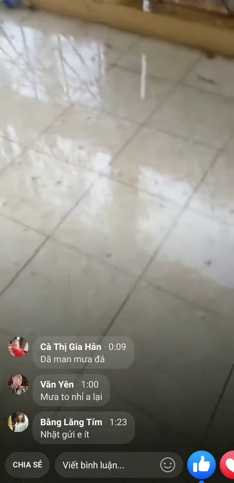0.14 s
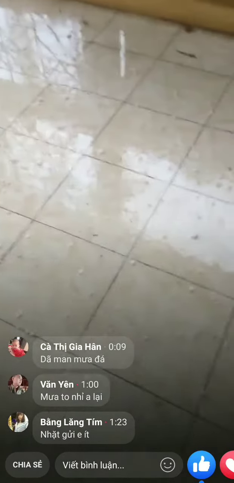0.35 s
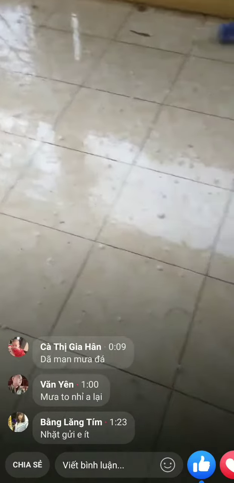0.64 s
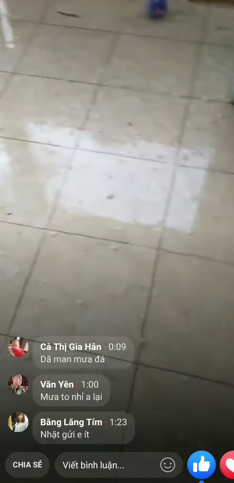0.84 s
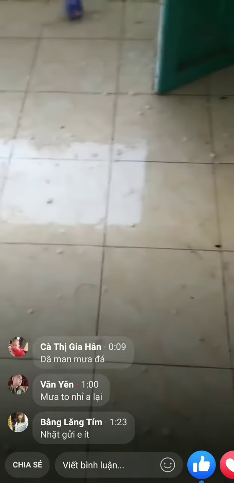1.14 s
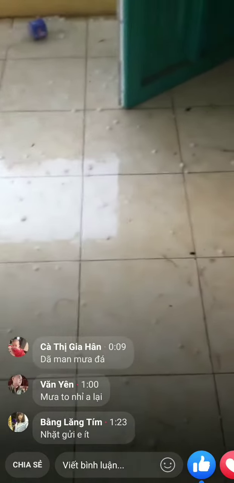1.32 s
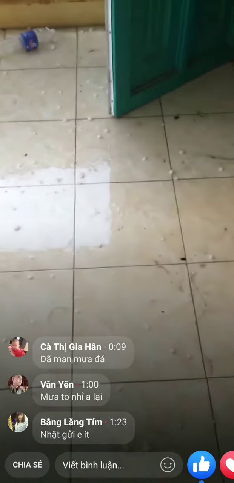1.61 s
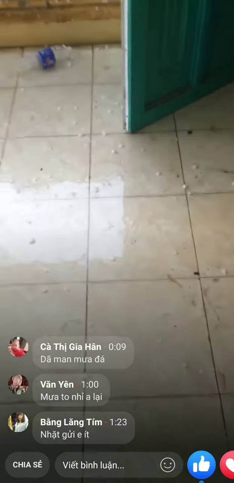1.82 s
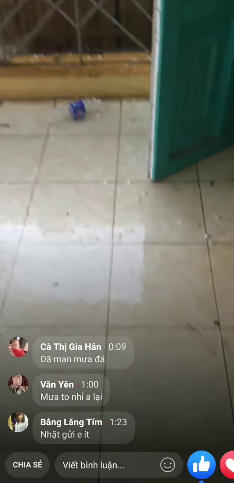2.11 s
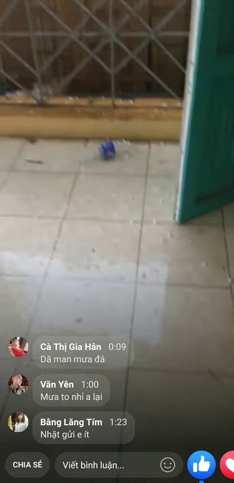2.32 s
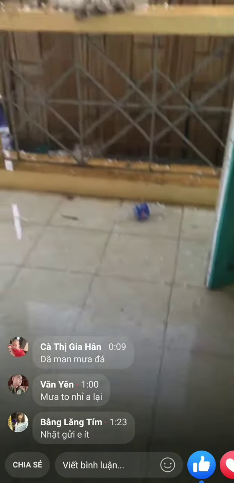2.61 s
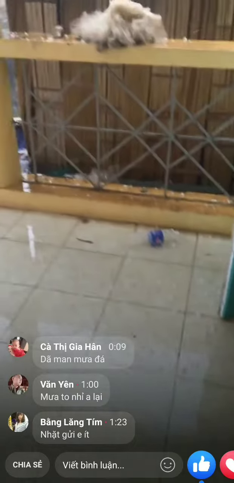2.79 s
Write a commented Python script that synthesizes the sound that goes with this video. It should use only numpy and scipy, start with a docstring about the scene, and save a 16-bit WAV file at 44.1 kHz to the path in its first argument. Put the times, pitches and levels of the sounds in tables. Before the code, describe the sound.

Hailstorm with heavy rain on metal roofs and a tiled porch, big stones cracking sharply nearby

```python
"""Heavy rain and hail heard from a tiled porch, in mono. From the start metal roofs roar all around, drops and
small ice patter in a bright hiss (filtered noise and random clicks), and faint hums come and go beneath.
Big hailstones crack and ring close by throughout (noise bursts with dying sines), the loudest from 0.4 to 1.5 s.
Dull roof knocks come between 0.5 and 2.6 s, and one stone pings on a metal bar at 2.3 s.
The big ones overload the microphone, and its gain control ducks the rain for a moment after each."""
import sys
import numpy as np
from scipy import signal
from scipy.fft import rfft, irfft
from scipy.io import wavfile

SR = 44100
rng = np.random.default_rng(int(sys.argv[2]) if len(sys.argv) > 2 else 0)


def put_to_file(sound):
    """Save the sound as 16-bit audio at rate SR, in the file named by the first command-line argument."""
    columns = np.atleast_2d(sound).T  # one column per channel
    safe = np.clip(columns, -1, 1)
    whole_steps = np.round(safe * 32767)
    wavfile.write(sys.argv[1], SR, whole_steps.astype(np.int16))


N = 130095
TIME = np.arange(N) / SR   # s

# Colour of struck ice, for large and small stones alike: f/Hz, level/dB
STONE_COLOUR = [(60, -51), (300, -50.5), (1000, -24.5), (2200, -20), (3200, -9), (4000, -3), (5400, 0),
                (7150, 2.5), (7700, -17), (8400, -9), (10300, -19.5), (11000, -33.5), (16000, -29.5)]
STONE_LOW_HZ, STONE_HIGH_HZ = 3413, 8694   # range in which a struck spot rings


def from_db(db):
    """Decibels to gain."""
    return 10 ** (np.asarray(db) / 20)


def rms_one(x):
    """Scale to rms 1."""
    return x / np.sqrt(np.mean(x ** 2) + 1e-20)


def level(rows):
    """Gain over time from rows of t/s, level/dB, joined by straight lines in dB."""
    return from_db(np.interp(TIME, *np.transpose(rows)))


def smooth(x, seconds):
    """One-pole low-pass with a time constant in seconds."""
    r = np.exp(-1 / (seconds * SR))
    return signal.lfilter([1 - r], [1, -r], x)


def drift(rate):
    """Random wander with rms 1, through two random points per flutter."""
    knots = rng.standard_normal(N)
    return rms_one(np.interp(TIME * rate * 2, np.arange(N), knots))


def coloured(x, points, size=2048):
    """Causal minimum-phase filter through f/Hz, level/dB points; white noise keeps its power."""
    hz, db = np.transpose(points)
    grid = np.maximum(np.fft.rfftfreq(size, 1 / SR), 1)
    curve_db = np.interp(np.log(grid), np.log(hz), db)
    cepstrum = irfft(np.log(rms_one(from_db(curve_db))))
    # folding the cepstrum onto positive time gives minimum phase
    fold = np.r_[1, np.full(size // 2 - 1, 2), 1, np.zeros(size // 2 - 1)]
    response = irfft(np.exp(rfft(cepstrum * fold)))
    return signal.fftconvolve(x, response)[:N]


def add(out, s, sound):
    """Mix a sound in at time s, cut at the end of out."""
    start = max(int(s * SR), 0)
    part = out[start:start + len(sound)]
    part += sound[:len(part)]


def dying(t60):
    """An envelope that falls by 60 dB in t60 seconds, then ends."""
    t = np.arange(int(t60 * SR)) / SR
    return from_db(-60 * t / t60)


def mode(hz, t60):
    """A struck mode: a dying sine."""
    envelope = dying(t60)
    return envelope * np.sin(2 * np.pi * hz * TIME[:len(envelope)])


def hum(lines, curve):
    """A faint low hum: steady sines under one level curve."""
    tones = sum(from_db(db) * np.sqrt(2) * np.sin(2 * np.pi * (hz * TIME + rng.random())) for hz, db in lines)
    return level(curve) * tones


def hums():
    """Two faint hums, one deeper than the other, that come and go separately."""
    # Tones of each hum: f/Hz, level/dB
    deep_lines = [(51, -49), (75, -64)]
    upper_lines = [(129, -55)]
    # Rise and fall of each hum, on top of its tones: t/s, level/dB
    deep_level = [(0, -7), (.38, 6.5), (.88, 0.5), (1.02, -19), (1.92, -10), (2.1, 9), (2.4, -5), (2.8, -2),
                  (2.95, -12)]
    upper_level = [(0, 3.5), (.26, 4.5), (.5, -11), (.65, 0.5), (.9, 1), (1.15, -5), (2.95, -10)]
    return hum(deep_lines, deep_level) + hum(upper_lines, upper_level)


def shower(per_s, spread_db):
    """Random drops of uneven size over the smooth hiss of far ones, with a slight flutter."""
    far_hiss_db = 1   # merged far drops, relative to the separate ones
    flicker_db, flicker_rate = .5, 47   # rms depth of the flutter; flutters per second
    sizes = from_db(spread_db * np.minimum(rng.exponential(1, N), 5))
    signs = rng.choice([-1, 1], N)
    landed = rng.random(N) < per_s / SR
    drops = rms_one(sizes * signs * landed)
    far_hiss = from_db(far_hiss_db) * rng.standard_normal(N)
    return rms_one(drops + far_hiss) * from_db(flicker_db * drift(flicker_rate))


def roof_rain():
    """The roar of rain on metal roofs all around: dense drops through the colour of the sheets."""
    # Loudness of the roar: t/s, level/dB
    roof_level = [(0, -25), (.4, -24), (.53, -24), (.58, -20.5), (.69, -23.5), (1.02, -22), (1.12, -24.5),
                  (1.3, -22), (1.5, -25.5), (1.56, -21.5), (1.74, -22), (1.86, -23.5), (2.08, -21.5),
                  (2.3, -24), (2.55, -24), (2.72, -28.5), (2.8, -23.5), (2.95, -24)]
    # Colour of the roar: f/Hz, level/dB
    roof_colour = [(20, -7.5), (85, -13.5), (130, -39.5), (220, -30.5), (320, -18), (500, -12), (780, -6),
                   (950, -2), (1400, 0.5), (1750, -1), (2600, -1.5), (4000, 3), (9000, -27)]
    return level(roof_level) * coloured(shower(per_s=4400, spread_db=1.5), roof_colour)


def near_splashes():
    """Bright splashes near the microphone: denser drops, with most of the power in the treble."""
    # Loudness of the splashes: t/s, level/dB
    splash_level = [(0, -13), (.13, -17.5), (.28, -12.5), (.36, -17.2), (.52, -13.5), (.62, -14),
                    (.72, -13), (.95, -12.5), (1.17, -13), (1.27, -13.5), (1.4, -13), (1.62, -13.5),
                    (1.8, -13.5), (1.88, -15.5), (2.0, -15.5), (2.3, -15), (2.72, -17.5), (2.95, -16.5)]
    # Colour of the splashes: f/Hz, level/dB
    splash_colour = [(500, -54), (1800, -29.5), (2700, -15), (3400, -14.5), (3850, -4.5), (4200, -0.5),
                     (4650, -8.5), (5250, 0.5), (6100, -3.5), (6900, 1), (7250, 0.5), (7550, -7.5),
                     (7800, -16), (8100, -8.5), (8600, -12), (9200, -14.5), (9900, -21), (10500, -23.5),
                     (11000, -28.5), (13300, -32), (15500, -49.5)]
    return level(splash_level) * coloured(shower(per_s=6000, spread_db=1.5), splash_colour)


def pings(per_s, db, t60, low_hz, high_hz):
    """Drops or ice land at random all over a surface, each ringing at a pitch of its own."""
    out = np.zeros(N)
    for when, pitch, size in rng.random((int(per_s * N / SR), 3)):
        hz = low_hz * (high_hz / low_hz) ** pitch
        add(out, when * N / SR, from_db(db) * (.5 + size) * mode(hz, t60))
    return out


def roof_pings():
    """Stones ring the metal sheets at random pitches."""
    return pings(per_s=55, db=-30, t60=0.07, low_hz=801, high_hz=2397)


def tile_ticks():
    """Drops tick on the tiles: a dense patter of short rings through a band-pass."""
    rings = pings(per_s=260.5, db=-15.5, t60=0.0778, low_hz=5005, high_hz=7360)
    return signal.sosfilt(signal.butter(2, [4300, 7700], "band", fs=SR, output="sos"), rings)


def knocks(count=4):
    """Stones knock dully on the roof, each setting off a cluster of low modes."""
    # Roof knocks: t/s, level/dB, f/Hz around which the modes are scattered
    roof_knocks = [(0.571, -36, 285), (.905, -30, 236), (1.055, -25, 185), (1.54, -34.5, 413),
                   (1.72, -30, 527), (2.585, -39, 314)]
    knock_t60_s = 0.12
    out = np.zeros(N)
    for s, db, hz in roof_knocks:
        for k, share in enumerate(rng.uniform(0.782, 1.3, count)):
            sign = (-1) ** k
            add(out, s, sign * from_db(db) / np.sqrt(count) * mode(hz * share, knock_t60_s))
    return out


def bar():
    """One stone shatters on a metal bar: rough contact noise drives its modes into a short ping."""
    # Modes of the bar: f/Hz, level/dB relative to the hit, t60/s
    bar_modes = [(2816, -1, 0.15), (2950, -2, 0.051), (3075, 4, 0.042), (3190, -11, 0.045)]
    hit_s, hit_db, contact_s = 2.293, -8.5, 0.0023   # contact_s: the crunch peaks after this time
    out = np.zeros(N)
    for hz, db, t60 in bar_modes:
        crunch = rng.standard_normal(N) * TIME * np.exp(-TIME / contact_s)
        ping = np.diff(signal.fftconvolve(crunch, mode(hz, t60)))
        add(out, hit_s, from_db(hit_db + db) * ping / np.abs(ping).max())
    return out


def impact(t60, hz, count=7):
    """One stone: a sharp tick, then a main ring with weaker ones around it and clatter echoing in the porch."""
    tick_db, ring_db, clatter_db = 4.5, -7.5, -4   # parts of one impact
    tick_s, build_s = 0.0006, 0.0055   # time constants: decay of the tick, swell of the reflections
    ring_t60_s = 0.066   # ring of the struck spot
    other_hz = rng.uniform(STONE_LOW_HZ, STONE_HIGH_HZ, count)
    others = sum(mode(f, ring_t60_s) for f in other_hz) * np.sqrt(2 / count)
    envelope = dying(t60)
    t = TIME[:len(envelope)]
    noise = rng.standard_normal(len(envelope))
    body = from_db(clatter_db) * envelope * noise
    add(body, 0, from_db(ring_db) * (mode(hz, ring_t60_s) + others))   # cut where the clatter ends
    tick = from_db(tick_db) * np.exp(-t / tick_s) * noise
    return tick + (1 - np.exp(-t / build_s)) * body


def small_hail():
    """Small stones fall at random, each a short weak impact."""
    per_s, t60_s = 180, 0.048
    weakest_db, spread_db = -22.5, 3.5   # the strongest lie two spreads above the weakest
    out = np.zeros(N)
    for _ in range(int(per_s * N / SR)):
        gain = from_db(weakest_db + spread_db * min(rng.exponential(), 2))
        hz = rng.uniform(STONE_LOW_HZ, STONE_HIGH_HZ)
        add(out, rng.uniform(0, N / SR), gain * impact(t60_s, hz))
    return coloured(out, STONE_COLOUR)


def spray(t60):
    """A shattering stone throws a dying crackle of ice fragments: random clicks."""
    fragments_per_s = 11000
    landed = rng.random(N) < fragments_per_s / SR
    fragments = rms_one(rng.standard_normal(N) * landed)
    envelope = dying(t60)
    return envelope * fragments[:len(envelope)]


def big_hailstones():
    """Big stones crack and ring close to the microphone, each with its spray of ice."""
    # Big stones: t/s, level/dB, clatter t60/s, strongest ring f/Hz, ice spray level/dB
    hailstones = [(.074, -10, .05, 6200, -25), (0.18, -7, 0.13, 6800, -24), (0.262, -10, 0.12, 6270, -28),
                  (0.294, -10, 0.21, 5920, -22), (.42, 2.5, 0.29, 6160, -15),
                  (0.621, -9.5, 0.11, 6770, -42), (0.672, -3, 0.023, 5450, -31),
                  (.775, -4, 0.18, 6860, -27), (.802, -8, 0.17, 5880, -25), (.908, 3.5, 0.098, 5760, -12),
                  (.938, -6, 0.28, 6900, -39), (1.054, 5, 0.15, 5564, -19.5),
                  (1.083, -1.5, 0.35, 5450, -25), (1.226, -6.5, 0.032, 5880, -36),
                  (1.33, 0, 0.18, 5650, -22), (1.432, 2.5, 0.19, 6740, -15), (1.545, -3, 0.18, 5350, -22.5),
                  (1.6, -14, .1, 5600, -34), (1.725, -7.5, 0.22, 5500, -42), (1.764, -8, .1, 5440, -27),
                  (1.803, -8.5, 0.081, 6700, -20), (2.067, -8, .05, 5130, -44),
                  (2.149, -10.5, 0.069, 6660, -41), (2.235, -8, .08, 5320, -31),
                  (2.296, -4.5, 0.12, 6510, -15.5), (2.425, -5, 0.2, 4130, -22),
                  (2.561, -3.5, 0.41, 6600, -15.5), (2.612, -14, 0.2, 6600, -23),
                  (2.8, -6, 0.073, 6450, -21)]
    # Colour of the ice spray: f/Hz, level/dB
    spray_colour = [(60, -5), (250, -3), (1000, -4), (3000, 3.5), (9000, 6), (11500, -2), (14500, -1.5),
                    (16000, -11)]
    spray_length = 0.88   # relative to the clatter
    stones, ice = np.zeros((2, N))
    for s, db, t60, hz, spray_db in hailstones:
        add(stones, s, from_db(db) * impact(t60, hz))
        add(ice, s, from_db(spray_db) * spray(spray_length * t60))
    return coloured(stones, STONE_COLOUR) + coloured(ice, spray_colour)


def scene():
    """Everything reaches one microphone; both channels are alike."""
    background = hums() + roof_rain() + near_splashes()
    surfaces = roof_pings() + tile_ticks() + knocks() + bar()
    hail = small_hail() + big_hailstones()
    return np.tile(background + surfaces + hail, (2, 1))


def record(dry):
    """The microphone overloads, gain control ducks after loud hits, and the top is cut."""
    overload_db, knee = -1.65, 10   # ceiling; a higher knee bends more sharply into it
    listen_s, threshold_db, slope = 0.0073, -6.5, 0.93   # slope: dB of ducking per dB above threshold
    attack_s, release_db_per_s = 0.047, 83
    cutoff_hz = 15700
    top = from_db(overload_db)
    clipped = dry / (1 + np.abs(dry / top) ** knee) ** (1 / knee)
    # the gain control follows the level ahead of the overload
    heard_db = 10 * np.log10(smooth(dry[0] ** 2, listen_s) + 1e-12)
    wanted_db = slope * np.maximum(heard_db - threshold_db, 0)
    # a running maximum on a rising ramp lets the ducking fall back at a steady rate
    release = release_db_per_s * TIME
    duck_db = np.maximum.accumulate(wanted_db + release) - release
    out = clipped * from_db(-smooth(duck_db, attack_s))
    return signal.sosfilt(signal.ellip(12, .1, 70, cutoff_hz, fs=SR, output="sos"), out)


dry = scene()
out = record(dry)
put_to_file(out)
```